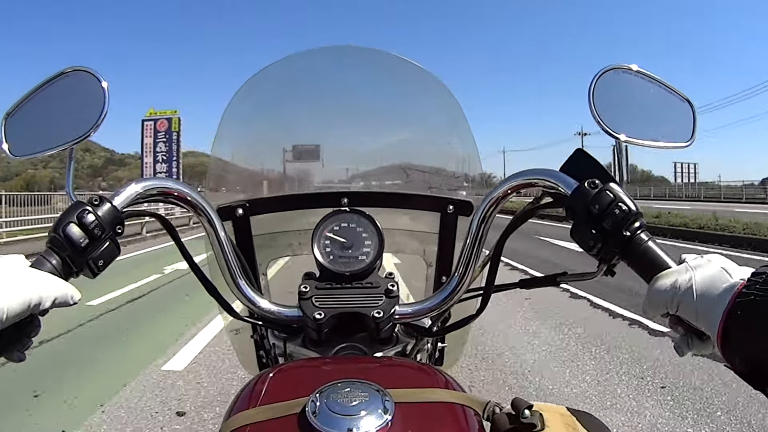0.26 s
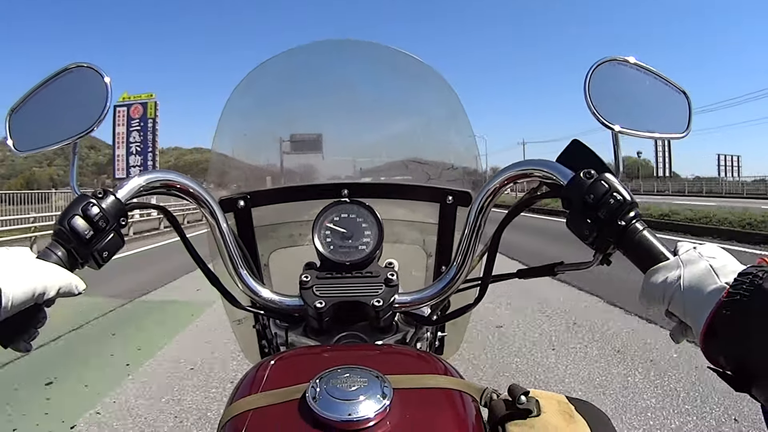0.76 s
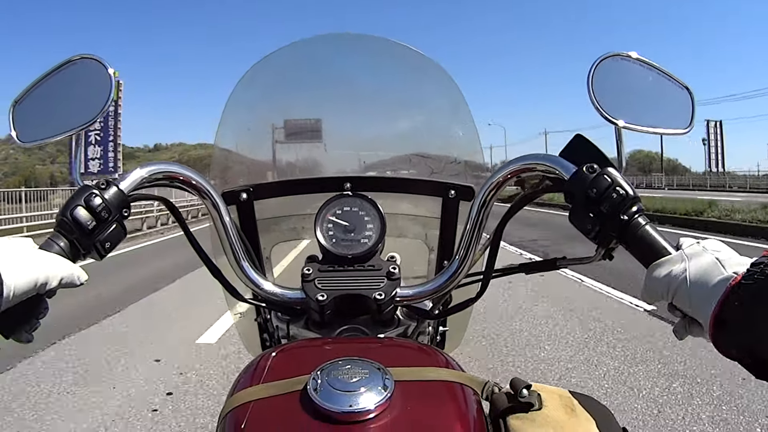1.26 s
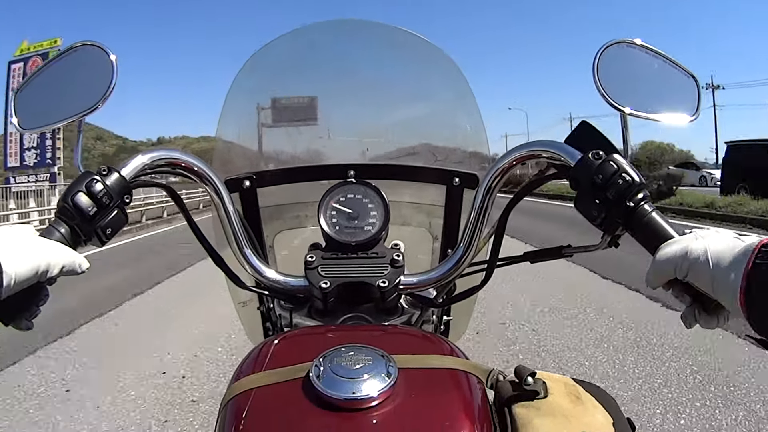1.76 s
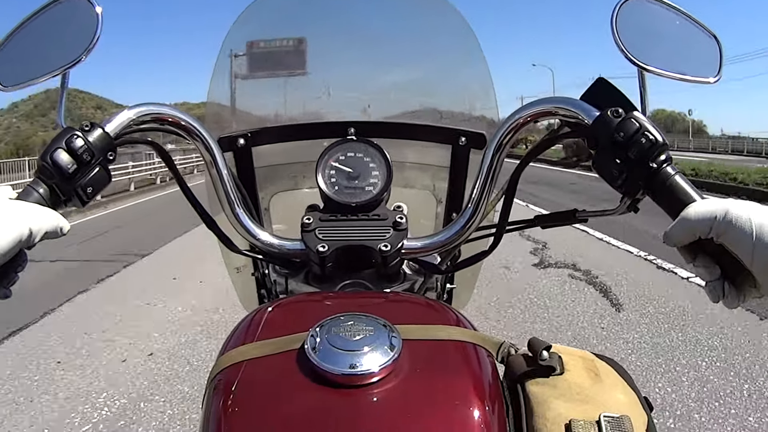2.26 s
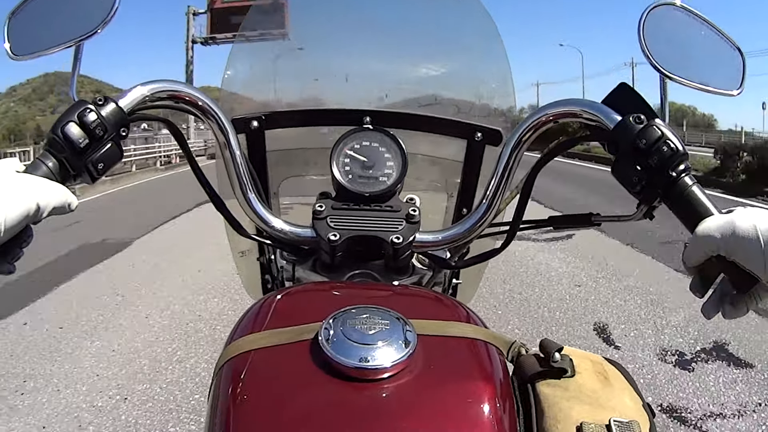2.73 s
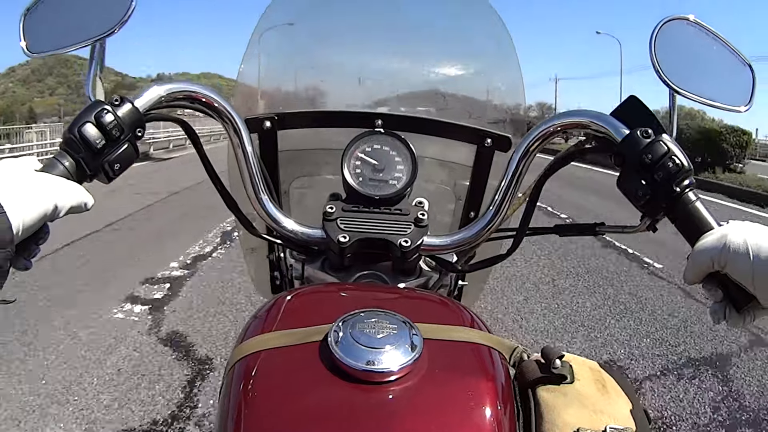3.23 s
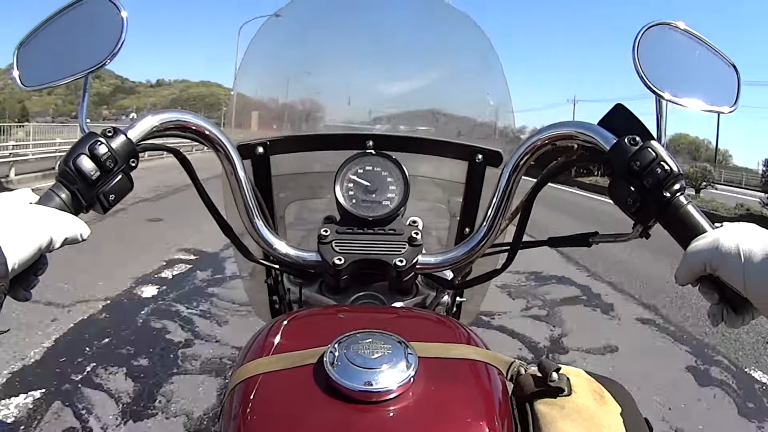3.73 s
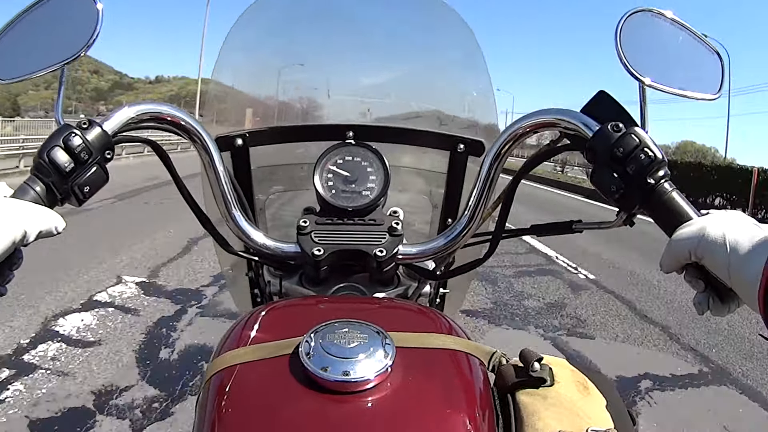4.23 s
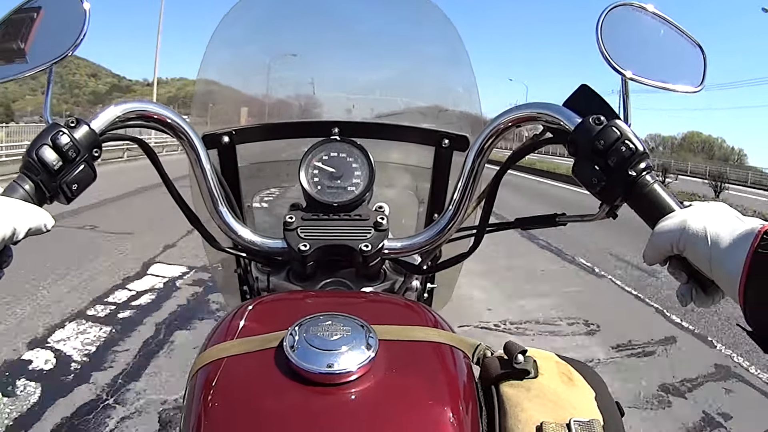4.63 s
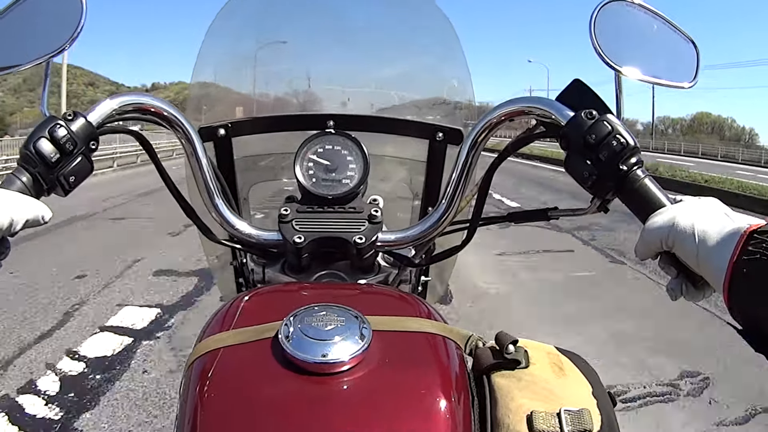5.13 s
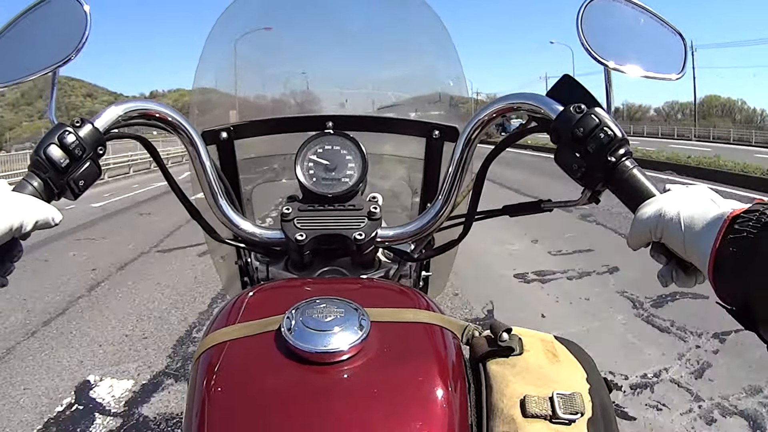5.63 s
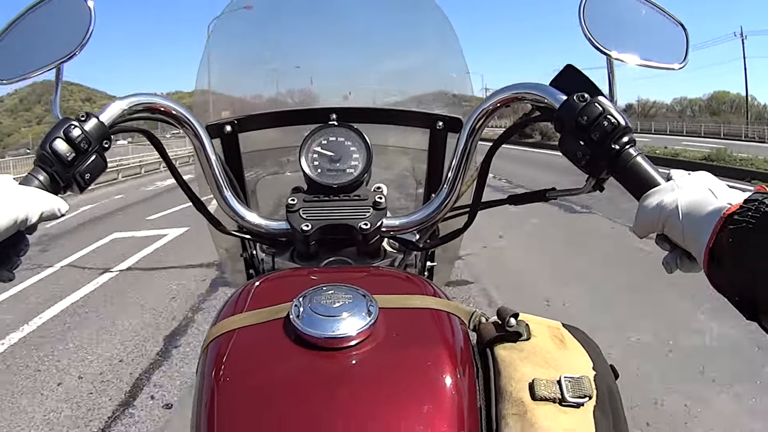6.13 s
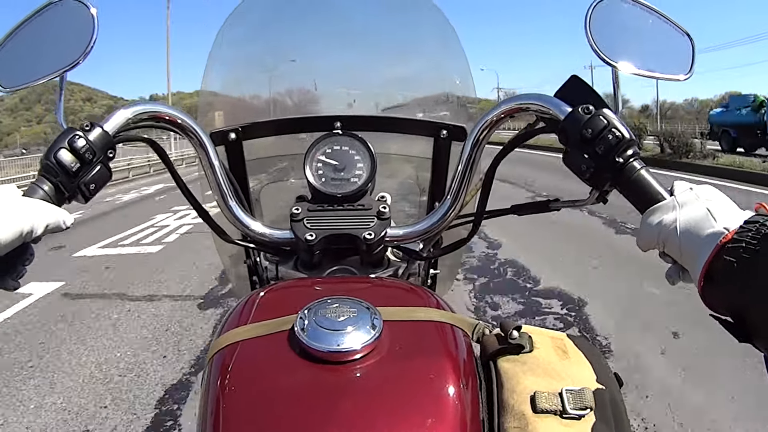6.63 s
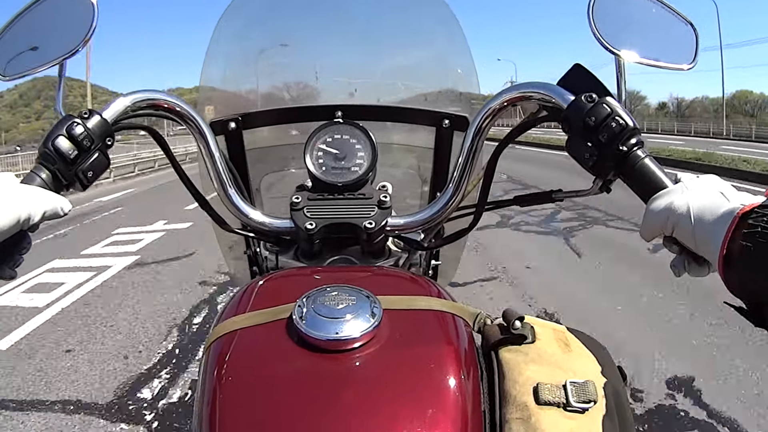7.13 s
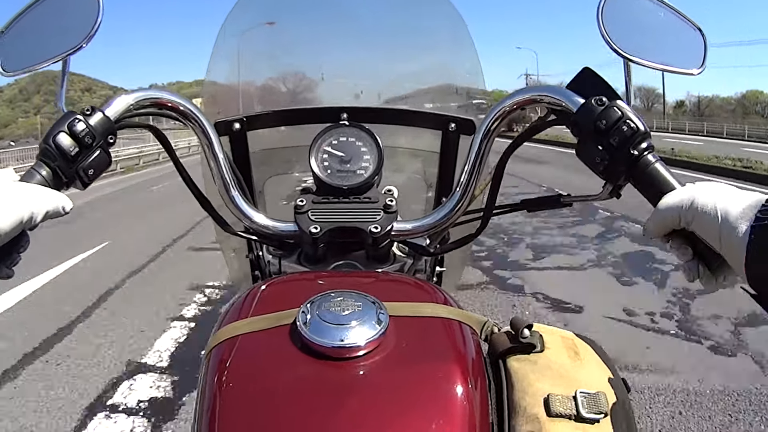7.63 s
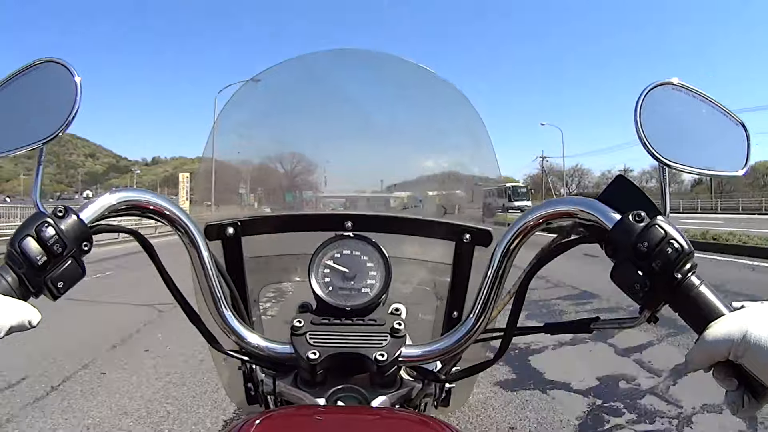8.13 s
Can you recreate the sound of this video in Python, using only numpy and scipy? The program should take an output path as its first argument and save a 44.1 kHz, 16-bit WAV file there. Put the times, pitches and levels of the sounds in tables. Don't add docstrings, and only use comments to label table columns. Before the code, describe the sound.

A V-twin runs at road speed, captured by stereo microphones on the bike, the left louder and distorting. Deep galloping thuds with bursts of airy hiss and rattling metal mark the first pull. Closing the throttle drops it to weak, lumpy burbling under coarse tyre roar and buffeting wind. After scattered firings, it gradually pulls hard again with sharp cracks, then cuts back to coasting as rough asphalt passes.

```python
import sys
import numpy as np
from scipy import signal
from scipy.fft import rfft, irfft, next_fast_len
from scipy.io import wavfile
from scipy.ndimage import uniform_filter1d, map_coordinates

SR = 44100
rng = np.random.default_rng(int(sys.argv[2]) if len(sys.argv) > 2 else 0)


def transcribe(signal):
    frames = np.atleast_2d(signal).T
    limited = np.clip(frames, -1, 1)
    pcm = np.round(limited * 32767).astype(np.int16)
    wavfile.write(sys.argv[1], SR, pcm)


def magnitude_from_level(level_db):
    exponent = np.asarray(level_db, float) / 20
    return 10 ** exponent


N = 369999


def stereo(left, right):
    return np.array([[left], [right]])


OPPOSED = stereo(1, -1)


def unit(x):
    return x / np.sqrt(np.mean(x ** 2) + 1e-20)


def along(points, hz):
    f, value = np.transpose(points)
    return np.interp(np.log(hz + 1), np.log(f + 1), value)


def curve(rows):
    start_s, value = np.transpose(rows)
    return np.interp(np.arange(N) / SR, start_s, value)


def wobble(rate):
    knots = rng.standard_normal(int(N * rate / SR) + 4)
    return map_coordinates(knots, [np.arange(N) * rate / SR])


def swells(rows):
    t = np.arange(N) / SR
    return sum(height * np.exp(-.5 * ((t - middle) / half) ** 2) for middle, half, height in rows)


def filtered(x, response):
    m = next_fast_len(N + SR // 2)
    return irfft(rfft(x, m) * response(np.fft.rfftfreq(m, 1 / SR)), m)[..., :N]


# start_s, cycles_per_s (one cycle is two crank turns)
ENGINE_SPEED = [(0, 12.65), (.64, 13.434), (1.58, 14.435), (1.75, 14.54), (1.95, 14.184), (2.27, 14.095),
                (3.82, 13.135), (4.66, 12.71), (5.4, 12.57), (6.05, 12.861), (6.44, 13.312), (7.31, 14.209),
                (7.63, 13.89), (8.39, 13.515)]


def engine_cycles():
    return np.cumsum(curve(ENGINE_SPEED)) / SR


def beats(share, scatter_db, jitter):
    cycles = engine_cycles()
    chance = rng.standard_normal((int(cycles[-1]) + 1, 2))
    at = np.interp(np.arange(len(chance)) + share, cycles, np.arange(N), right=N)
    at = at + jitter * SR * chance[:, 0]
    return np.bincount(np.clip(at, 0, N).astype(int), magnitude_from_level(scatter_db * chance[:, 1]), N + 1)[:N]


def ring(x, modes, signs, blunt):
    def resonance(f, sign, hz, width, left_db, right_db):
        return sign * magnitude_from_level(stereo(left_db, right_db)) * 1j * f * width / (hz * hz - f * f + 1j * f * width)

    def response(f):
        body = sum(resonance(f, sign, *mode) for sign, mode in zip(signs, modes))
        softness = np.exp(-.5 * (2 * np.pi * f * blunt) ** 2)
        return body * softness / (1 + (35 / (f + 1)) ** 4)

    return filtered(x, response)


# pitch_hz, correlation
MIC_LIKENESS = [(20, -.6), (40, -.5), (100, -.2), (150, .3), (390, .6), (630, .85), (1000, .65),
                (1600, .45), (2560, .5), (4100, .45), (9000, .1)]
# pitch_hz, left_minus_right_db
MIC_BALANCE = [(25, 4), (60, 0), (100, 0), (150, 9), (250, 8), (630, 7.5), (1600, 8.5), (4100, 6.5),
               (9000, 8)]
# pitch_hz, left_lead_rad
MIC_LEAD = [(0, 0.59), (260, 0.83), (950, -0.74), (1550, 1), (2580, 0.49), (4310, 1)]


def rush(spectrum, patchy_db):
    z = signal.stft(rng.standard_normal((2, N)), nperseg=512)[2]
    field = rng.standard_normal(z.shape[1:])
    field = uniform_filter1d(uniform_filter1d(field, 6, 0), 14, 1)
    pair = signal.istft(z * magnitude_from_level(patchy_db * unit(field)), nperseg=512)[1][:, :N]

    def mid_and_side(hz):
        turn = np.arccos(np.clip(along(MIC_LIKENESS, hz), -1, 1)) / 2
        return magnitude_from_level(along(spectrum, hz)) * [np.cos(turn), np.sin(turn)]

    def place(hz):
        return (magnitude_from_level(along(MIC_BALANCE, hz) / 2) * np.exp(.5j * along(MIC_LEAD, hz))) ** OPPOSED

    mid, side = filtered(pair, mid_and_side)
    both = filtered(np.array([mid + side, mid - side]), place)
    return both / np.std(both.mean(0))


def opening_step():
    return swells([(0.00015, .003, .4)]) * stereo(1, 0)


# pitch_hz, density_db_per_hz
TYRE_SPECTRUM = [(120, -26.5), (200, -0.5), (253, -11.5), (346, -5), (416, -13), (632, -9.5), (800, -11.5),
                 (1150, -23), (1300, -29.5), (2200, -36.5), (3000, -73), (5000, -110)]
# pitch_hz, density_db_per_hz
WIND_SPECTRUM = [(4, -12), (10, -1), (30, 0), (60, -9), (120, -14), (200, -19), (400, -40), (1500, -120)]
# pitch_hz, density_db_per_hz
GRIT_SPECTRUM = [(500, -28.5), (750, 2.5), (1200, 2), (1400, -16), (2500, -46.5), (4000, -120)]
# pitch_hz, density_db_per_hz
AIR_SPECTRUM = [(700, -16), (1400, 1), (2150, -1), (2500, -7), (3200, -9), (4000, -12), (4600, -14),
                (5100, -20), (6300, -28), (11000, -37)]
# middle_s, half_length_s, roar_db
ASPHALT = [
    (2.8, 0.033, 2),
    (3.5, 0.58, 1.5),
    (4.12, 0.096, -3.5),
    (4.5, 0.52, 2),
    (6.1, 0.072, -1.5),
    (7.4, 0.49, -1),
    (7.67, 0.096, 4),
    (7.92, 0.081, -2),
    (8.18, 0.05, 4),
]


def road(throttle):
    coarse = swells(ASPHALT)
    tyres = magnitude_from_level(-26 + coarse - 1.3 * throttle + 1.1 * wobble(30)) * rush(TYRE_SPECTRUM, patchy_db=0.78)
    grit = magnitude_from_level(-42.5 + 2.8 * coarse) * rush(GRIT_SPECTRUM, patchy_db=2.5)
    air = magnitude_from_level(-48.5) * rush(AIR_SPECTRUM, patchy_db=1.9)
    lumps = magnitude_from_level(1.5 * np.array([wobble(14), wobble(14)]))
    wind = magnitude_from_level(-23.5 - 2.5 * throttle) * lumps * rush(WIND_SPECTRUM, patchy_db=.8)
    return tyres + grit + air + wind


# cycle_share, level_db
EXHAUST_BEATS = [
    (.232, .7),
    (.508, 1.3),
    (.667, -1.2),
    (.945, -1.2),
]
# pitch_hz, width_hz, left_db, right_db
PIPE_MODES = [(59, 19, 38, 39.8), (96, 45, 30, 36.4), (151, 24, 43, 18), (328, 19, 18.5, 10.5)]


def exhaust(throttle):
    train = sum(magnitude_from_level(db) * beats(share, scatter_db=1.8, jitter=.0003) for share, db in EXHAUST_BEATS)
    burble = magnitude_from_level(-32.5 + 1.3 * wobble(32)) * rng.standard_normal((2, N))
    shut = np.clip(1 - 0.74 * throttle, 0, 1)
    return ring((train + burble) * shut, PIPE_MODES, (1, OPPOSED, -1, 1), blunt=0.00095)


# start_s, opening (0-1)
TWIST_GRIP = [(0, 0.2), (.22, .36), (.36, 0.9), (.8, 0.98), (1.7, 0.79), (1.86, 0.35), (1.95, 0.06),
              (5.07, 0.03), (5.17, 0.21), (5.45, 0.44), (6.15, 0.66), (6.3, 1), (7.1, 0.86), (7.4, 0.78),
              (7.5, .4), (7.6, 0.06), (8.39, 0.09)]


def twist_grip():
    return np.clip(curve(TWIST_GRIP), 0, 1)


def charge(grip):
    return np.tanh(grip / .29) + strays()


# cycle_share, boom_left_db, boom_right_db, bark_db, frame_knock_db
INLET_VALVES = [
    (.174, -8.5, -3, -5.5, 3),
    (.235, 2.5, 3, 2.5, -8.5),
    (.589, -40, -14, -8, 5),
    (.662, 4, 2, -.4, -3.5),
]
# pitch_hz, width_hz, left_db, right_db
BOOM_MODES = [(67.5, 12.5, 40, 35.5), (83, 21, -10, 45)]
# pitch_hz, width_hz, left_db, right_db
BARK_MODES = [(140, 57, 48.5, 35), (217, 27, -5, 37), (354, 144, 42.5, 35.5)]
# pitch_hz, width_hz, left_db, right_db
FRAME_MODES = [(105, 27, 39.5, -20)]
BARK_SIGNS = (1, OPPOSED, -1)


def intake(throttle, grip):
    blunt = .00123
    front_push, rear_push = 1 - .52 * (1 - grip), 1 - .36 * (1 - grip)
    boom = bark = frame = 0
    for valve, size, way in zip(INLET_VALVES, (front_push, 1, rear_push, 1), (1, -1, 1, -1)):
        share, left_db, right_db, bark_db, frame_db = valve
        knock = throttle * size * beats(share, scatter_db=.8, jitter=.00015)
        boom = boom + way * magnitude_from_level(stereo(left_db, right_db)) * knock
        bark = bark + way * magnitude_from_level(bark_db) * knock
        frame = frame + magnitude_from_level(frame_db) * knock
    thud = ring(boom, BOOM_MODES, (1, 1), blunt) + ring(bark, BARK_MODES, BARK_SIGNS, blunt)
    return thud + ring(frame, FRAME_MODES, (1,), blunt)


# pitch_hz, density_db_per_hz
JET_SPECTRUM = [(290, -27.5), (600, 0), (1140, -10), (1530, -15), (1770, -21.5), (3230, -24.5),
                (4550, -31.5), (5900, -40.5), (8000, -48), (11000, -49.5)]


def intake_hiss(grip):
    def bell(seconds):
        return signal.windows.gaussian(SR // 20, seconds * SR)

    burst = bell(.0017) + .22 * np.roll(bell(.004), 190)
    front, rear = [signal.fftconvolve(beats(valve[0] - .012, scatter_db=1, jitter=.0003), burst, "same")
                   for valve in INLET_VALVES[1::2]]
    flow = sum(beats(valve[0] - .05, scatter_db=-2.0, jitter=0.0014) for valve in INLET_VALVES[::2])
    flow = 0.31 * signal.fftconvolve(flow, bell(0.004), "same") + 0.023
    dull = filtered(rush(JET_SPECTRUM, patchy_db=4.5), lambda hz: 1 / (1 + (hz / 8000) ** 4))
    jet = rush(JET_SPECTRUM, patchy_db=1)
    thin = filtered(jet, lambda hz: 1 - .4 / (1 + (hz / 1150) ** 6))
    bright = (.9 + 1.2 * np.clip(1 - grip, 0, 1)) * front * thin
    bright = bright + .92 * rear * jet * magnitude_from_level(stereo(0, -3.5))
    leak = 0.046
    return magnitude_from_level(-18) * (np.clip(grip, 0, 2) ** 1.78 + leak) * (bright + flow * dull)


def drive(grip):
    cycles = engine_cycles()
    teeth, tooth_late = 23, .88
    phase = 2 * np.pi * (teeth * cycles - tooth_late) + .25 * wobble(9)
    tone = magnitude_from_level(-28.6 + 1.2 * wobble(12)) * np.sin(phase)
    surge = 1 + 1.35 * np.cos(2 * np.pi * (cycles - .25))
    return grip ** 1.1 * surge * tone * magnitude_from_level(stereo(0, -14.5))


# pitch_hz, width_hz, left_db, right_db
SNAP_MODES = [(840, 220, 21, 9), (1400, 500, 14, 3)]


def snap(grip):
    hits = beats(.615, scatter_db=2.5, jitter=.0002)
    return ring(grip ** 1.8 * hits, SNAP_MODES, (-1, -1), blunt=.00012)


# cycle_share, pitch_hz, width_hz, left_gain, right_gain (signed)
PANEL_MODES = [(.029, 322, 15, -58, -11), (.208, 220, 33, -11, 19), (.61, 314, 31, 37, 10),
               (.665, 229, 70, 9, 18), (.665, 273, 40, 27, -4), (.624, 767, 140, -10, -4.5),
               (.633, 1117, 150, 6, 1), (.209, 750, 370, -2.7, -1.3), (.203, 345, 12, -32, -14),
               (.699, 366, 10, -18, -6), (.214, 168, 46, -50, -30), (.685, 156, 14, 50, 14),
               (.27, 91, 52, 4, 24)]


def panels(grip):
    total = 0
    for share, hz, width, left, right in PANEL_MODES:
        hits = grip ** 1.5 * beats(share, scatter_db=3.0, jitter=.0001)
        total = total + ring(hits, [(hz, width, 0, 0)], (stereo(left, right),), blunt=0.000073)
    return total


def whistle(grip):
    centre_hz, width_hz = 1880, 320
    band = filtered(rng.standard_normal(N), lambda hz: np.exp(-.5 * ((hz - centre_hz) / width_hz * 2) ** 2))
    return magnitude_from_level(-52 + 2 * wobble(40)) * grip * unit(band) * stereo(0, 1)


# pitch_hz, density_db_per_hz
RATTLE_SPECTRUM = [(1500, -30), (2500, -3), (4500, 0), (6500, -7), (9000, -13), (11000, -14)]


def rattle(grip):
    ticks_per_s = 500
    ticks = (rng.random((2, N)) < ticks_per_s / SR) * magnitude_from_level(1.5 * rng.exponential(1, (2, N))) + .25
    spectrum = RATTLE_SPECTRUM + [(20000, -10)]
    fizz = unit(filtered(ticks * rng.standard_normal((2, N)), lambda hz: magnitude_from_level(along(spectrum, hz))))
    return magnitude_from_level(-62) * grip ** 1.1 * fizz * magnitude_from_level(stereo(0, 3.5))


# start_s, peak_db
SHARP_CRACKS = [(0.2526, -39.5), (0.8816, -30.5), (1.1707, -32), (1.3848, -28), (1.422, -30.5),
                (2.9188, -49.5), (3.4084, -45.5), (3.8186, -45), (5.053, -45), (5.2088, -38.5),
                (5.2882, -40), (5.3673, -38.5), (6.2285, -33.5), (6.4863, -32), (6.6061, -24.5),
                (6.6358, -30), (6.785, -28), (6.972, -30.5), (7.3287, -29.5)]


def cracks():
    half_s = .0012
    bursts = swells([(s + half_s, half_s, magnitude_from_level(db - 0.5)) for s, db in SHARP_CRACKS])
    return bursts * rush(AIR_SPECTRUM, patchy_db=2.5)


# start_s, strength (0-1)
LATE_POPS = [(1.989, 0.2), (2.271, 0.3), (2.345, .3), (2.558, 0.5), (2.629, 0.36), (2.7, .25), (2.846, 0.5),
             (2.878, .3), (2.992, 0.2), (3.915, 0.2), (4.043, 0.4), (4.35, .3)]


def pops():
    start_s, strength = np.transpose(LATE_POPS)
    train = -np.bincount((start_s * SR).astype(int), strength, N)
    return ring(train, BARK_MODES, BARK_SIGNS, blunt=.0011) + ring(train, BOOM_MODES, (1, 1), blunt=.0012)


# middle_s, charge (0-1)
STRAY_FIRINGS = [
    (4.265, .95),
    (4.42, 0.8),
    (4.657, 0.6),
    (4.815, 0.8),
    (4.85, .25),
    (4.894, 0.7),
    (4.973, 0.8),
    (5.011, 0.4),
    (5.051, 0.6),
    (8.195, 0.6),
]


def strays():
    return swells([(s, .012, size) for s, size in STRAY_FIRINGS])


def scene():
    grip = twist_grip()
    throttle = charge(grip)
    surroundings = opening_step() + road(throttle)
    breath = exhaust(throttle) + intake(throttle, grip) + intake_hiss(grip + .08 * strays())
    metal = drive(grip) + snap(grip) + panels(grip) + rattle(grip) + cracks()
    return surroundings + breath + metal + whistle(grip) + pops()


def top_cut(x):
    return signal.sosfilt(signal.butter(12, 15800, fs=SR, output="sos"), x)


def record(dry):
    kept = filtered(dry, lambda hz: hz < 11000)
    ceiling = .99
    loud = kept / (1 + np.abs(kept / ceiling) ** 11) ** (1 / 11)
    return top_cut(loud)


dry = scene()
out = record(dry)
transcribe(out)
```